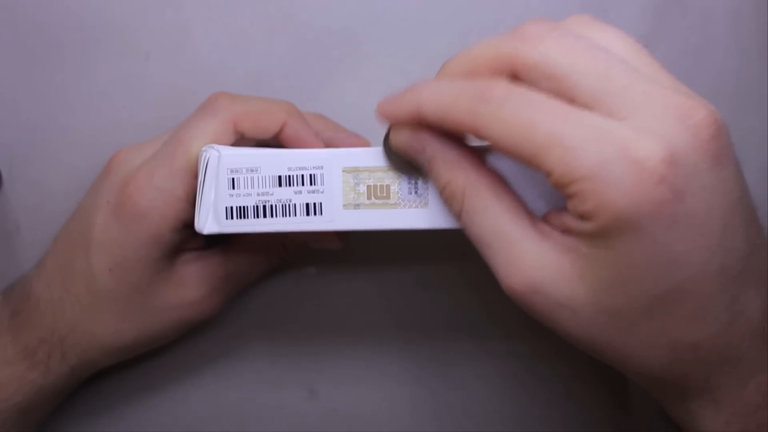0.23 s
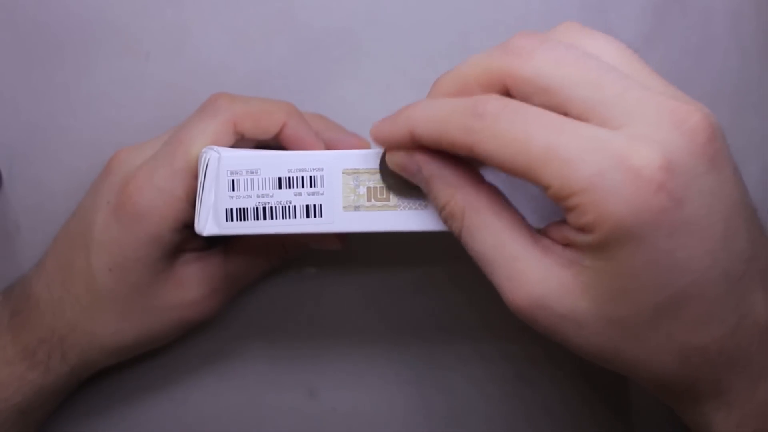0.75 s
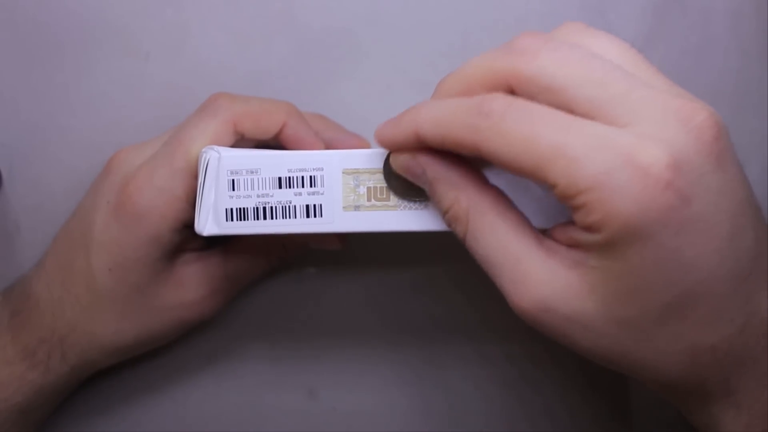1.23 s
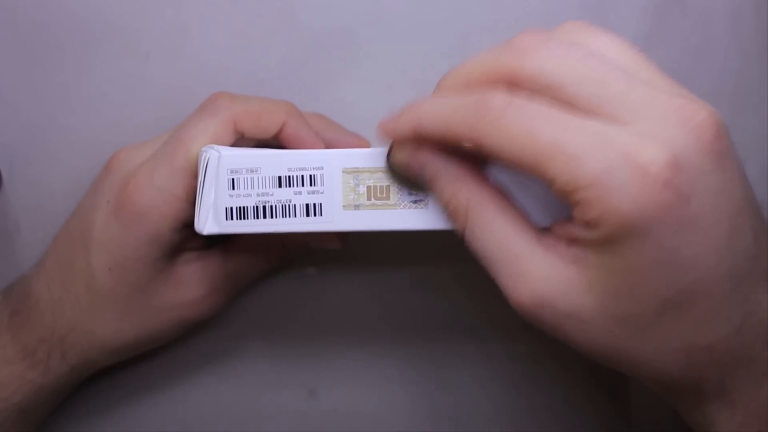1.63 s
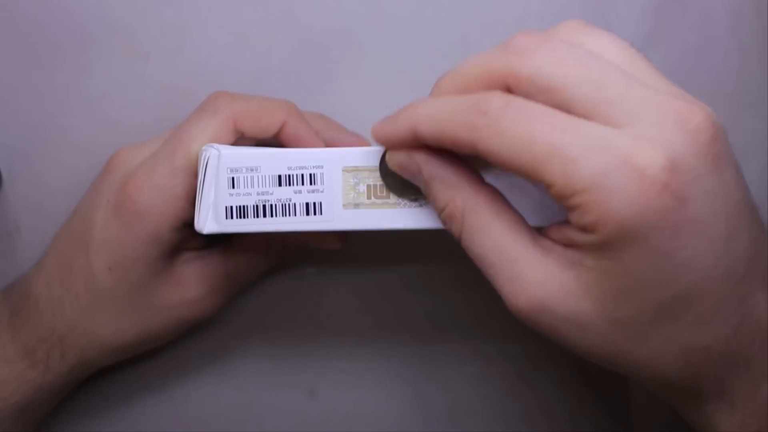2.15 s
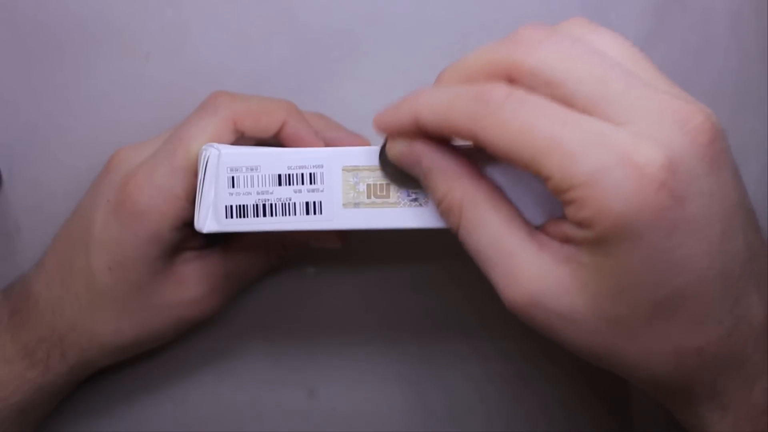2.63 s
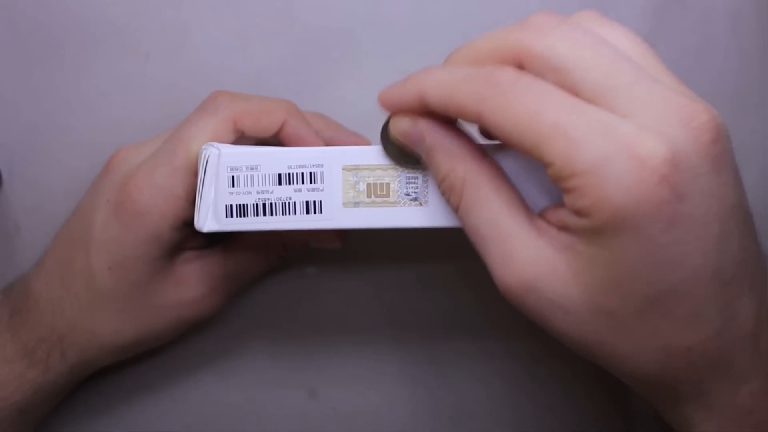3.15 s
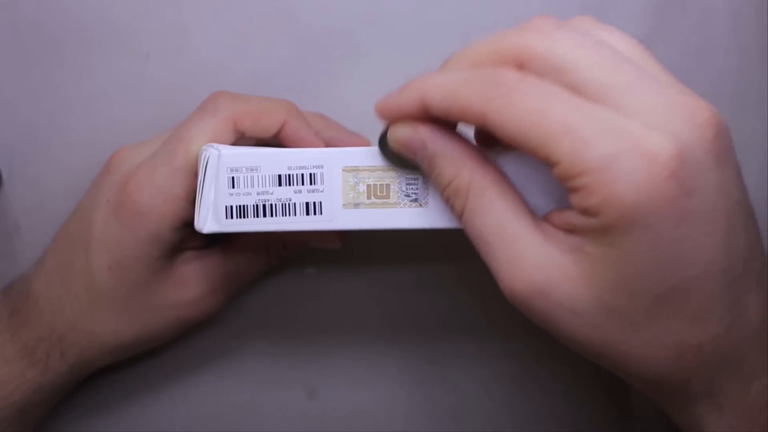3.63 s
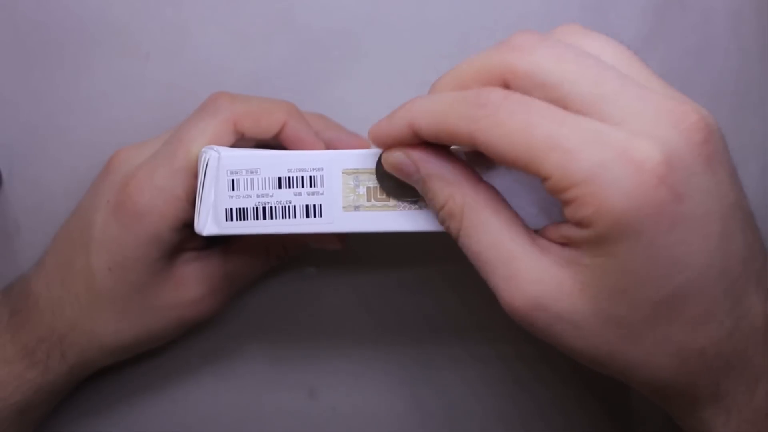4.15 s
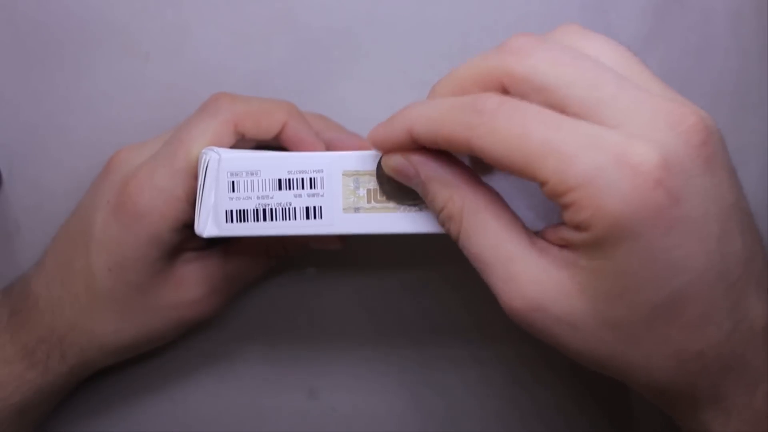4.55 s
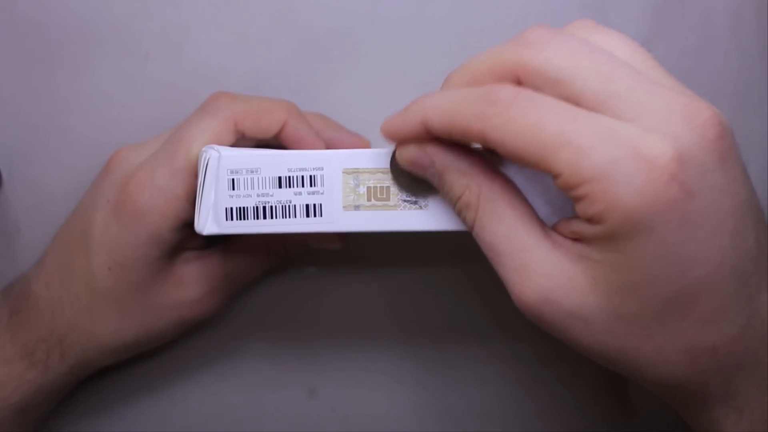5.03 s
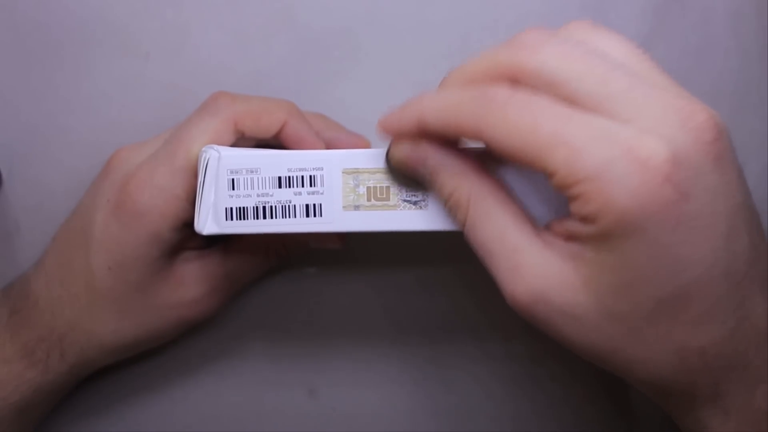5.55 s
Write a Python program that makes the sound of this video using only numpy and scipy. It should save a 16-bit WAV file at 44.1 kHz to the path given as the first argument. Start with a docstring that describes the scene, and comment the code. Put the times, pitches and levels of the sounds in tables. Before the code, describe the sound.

A coin scratches rapidly back and forth at the coating on a small cardboard box, catching and knocking a few times midway.

```python
"""A coin scratches the coating off a label on a small hand-held cardboard box, about nine strokes a second.
Its edge sticks and slips and rings the box: pushes sound bright, pulls hollow. Midway the coin
catches, lifts and knocks down again a few times; a few chips of coating tick off.
A small room answers, over a faint hiss."""
import sys
import numpy as np
from scipy import signal
from scipy.fft import rfft, irfft, next_fast_len
from scipy.io import wavfile

SR = 44100
rng = np.random.default_rng(int(sys.argv[2]) if len(sys.argv) > 2 else 0)


def log_audio(samples):
    """Write samples as a 16-bit WAV file to the path given in sys.argv[1]."""
    # one column per channel
    frames = np.atleast_2d(samples).T
    # limit to full scale, then quantise
    limited = np.clip(frames, -1, 1)
    pcm = np.round(limited * 32767).astype(np.int16)
    wavfile.write(sys.argv[1], SR, pcm)


N = 255720


def undb(db):
    return 10 ** (np.asarray(db) / 20)


def unit_rms(x):
    return x / np.sqrt(np.mean(x ** 2))


def freqs(size):
    return np.linspace(0, SR / 2, size // 2 + 1).clip(1)


def contour(points, f):
    """Gain along (f/Hz, level/dB) points."""
    hz, db = np.transpose(points)
    return undb(np.interp(np.log(f), np.log(hz), db))


def resonance(f, hz, width_hz):
    """Gain of one steep-sided resonance."""
    return 1 / (1 + ((f * f - hz * hz) / (f * width_hz)) ** 2)


def response(gain):
    """Minimum-phase impulse response of this spectral shape, unit energy."""
    cepstrum = irfft(np.log(gain + 1e-9))
    half = len(cepstrum) // 2
    ir = irfft(np.exp(rfft(2 * cepstrum[:half], 2 * half)))[:half]
    return ir / np.linalg.norm(ir)


def filtered(x, gain):
    size = 2 * next_fast_len(N // 2 + SR // 4, real=True)
    return irfft(rfft(x, size) * gain(freqs(size)))[..., :N]


def ring(x, ir):
    return signal.fftconvolve(x, ir)[:N]


def impulse(start_s, db):
    return undb(db) * signal.unit_impulse(N, int(start_s * SR))


def bands(force, drum_hz=950, grit_hz=2100):
    """Split a force into panel drum (low), rasp (mid) and coating grit (high)."""
    drum = filtered(force, lambda f: 1 / (1 + (f / drum_hz) ** 8))
    grit = filtered(force, lambda f: 1 / (1 + (grit_hz / f) ** 8))
    return np.array([drum, force - drum - grit, grit])


def friction(speed, slip_hz, jitter=0.45, scatter_db=4, dust_db=-5, patch_db=1.0, patch_hz=160):
    """Uneven slips of the edge, quicker at speed, in the crackle of patchy, crumbling coating."""
    gaps, sizes, coating = rng.standard_normal((20000, 3)).T
    rate_hz = slip_hz * (0.3 + 0.7 * speed)
    onsets = np.searchsorted(np.cumsum(rate_hz) / SR, np.cumsum(np.exp(jitter * gaps)))
    slips = np.bincount(onsets, undb(scatter_db * sizes), N + 1)[:N] / np.sqrt(rate_hz)
    dust = undb(dust_db) * rng.standard_normal(N)
    patches = np.interp(np.arange(N) / SR * patch_hz, np.arange(len(coating)), coating)
    return unit_rms((unit_rms(slips - slips.mean()) + dust) * undb(patch_db * patches))


# Box and coin resonances, plus one room mode near 224 Hz: f/Hz, width/Hz, push level/dB, pull level/dB
MODES = [(139.4, 107, -28.5, -23), (224.3, 12.4, -21, -14), (300.8, 41.5, -25.5, -8.5),
         (379, 73, -14.5, -7.5), (478, 112, -15, -5.5), (553, 36.3, -17.5, -1.5), (608, 92, -9.5, -5),
         (785, 150, -19, -9), (862, 16.5, -6, 0), (915, 39, -8.5, -9.5), (1008, 99, -14, -9.5),
         (1127.3, 40.6, -10.5, -0.5), (1184, 66, -10, -0.5), (1252, 137, -6, -4), (1348.4, 62, -4.5, -2.5),
         (1447, 71, -12.5, -13), (1680, 360, -17, -18), (2042, 184, -2, -8.5), (2352, 146, -22, -11),
         (2630, 710, -16.5, -17), (3296, 590, -15.5, -17.5), (3768, 198, -11, -17),
         (4280, 590, -18.5, -17.5), (4774, 540, -19, -21.5), (5584.0, 193, -20, -22),
         (6270, 810, -30.5, -32.5), (7100, 2440, -34.5, -34.5), (9560, 580, -43, -37.5),
         (11090, 1260, -38, -38), (13000, 5000, -47, -44)]

def box(tilt, wander, vary_db=2.39, detune=0.0049):
    """Box, coin and one room mode. Coin tilt (0 push, 1 pull) weights them; contact wander varies them."""
    hz, width_hz, push_db, pull_db = np.transpose(MODES)[:, :, None]
    level_shift, pitch_shift = wander * rng.standard_normal((2, len(MODES), 1))
    db = push_db + tilt * (pull_db - push_db) + vary_db * level_shift
    gains = undb(db) * resonance(freqs(8192), hz * (1 + detune * pitch_shift), width_hz)
    return response(np.linalg.norm(gains, axis=0))


# Slow drift of the panel drum: t/s, level/dB
DRUM_DRIFT = [(0, 0.5), (1.4, 1.2), (2, -1.5), (2.6, 2.3), (3.6, -2), (4.5, -1.5), (5.8, -2.2)]

def scrape(strokes, law, tilt, slip_hz):
    """Friction rings the box. Speed drives all bands; pressure adds rasp and grit, hardly any drum."""
    t, speed, drives = np.arange(N) / SR, np.zeros(N), []
    base_db, pressure_slope, rise_power, fall_power = np.transpose(law)
    for start_s, rise_s, fall_s, pressure_db in strokes:
        turns_s = start_s + np.cumsum([0, rise_s, fall_s])
        span = slice(*np.searchsorted(t, turns_s[::2]))
        phase = np.interp(t[span], turns_s, [0, 1, 2])
        speed[span] = np.abs(np.sin(np.pi / 2 * phase))
        band_db = base_db + pressure_slope * pressure_db
        band_db[0] += np.interp(start_s, *np.transpose(DRUM_DRIFT))
        drive = speed[span, None] ** np.where(phase[:, None] < 1, rise_power, fall_power)
        drives.append((span, (drive * undb(band_db)).T))
    force = bands(friction(speed, slip_hz))
    out = np.zeros(N + SR)
    for span, drive in drives:
        stroke = signal.fftconvolve((force[:, span] * drive).sum(axis=0), box(tilt, wander=0.91))
        out[span.start:span.start + len(stroke)] += stroke
    return out[:N]


# Back strokes: t/s, speed rise/s, speed fall/s, pressure/dB
PULL_STROKES = [(-.004, .033, 0.056, -7.5), (.252, 0.0041, 0.087, 0.5), (.495, .011, 0.068, -1),
                (.719, .033, 0.045, 2), (.942, .033, 0.043, 1.5), (1.171, .014, 0.07, 1),
                (1.39, .019, 0.069, 1.5), (1.628, .037, .054, 1), (1.845, 0.039, 0.049, 1.7),
                (2.069, 0.021, 0.085, 2.2), (2.297, 0.024, 0.07, -1.5), (2.526, .014, 0.082, .5),
                (2.753, .016, 0.079, 1), (2.976, 0.019, .081, -0.3), (3.225, 0.0089, 0.098, -3.3),
                (3.603, .004, 0.021, 3), (3.887, .006, 0.064, 3.5), (3.965, .018, 0.043, 1.5),
                (4.05, .075, .02, 1), (4.284, .025, .028, 1.5), (4.488, 0.029, 0.034, -1),
                (4.698, 0.015, .054, -5.5), (4.884, 0.035, .046, -9), (5.144, 0.027, .027, 0.8),
                (5.354, .049, .022, 0.5), (5.553, .033, 0.044, 0.9), (5.749, 0.044, 0.039, 1)]
# Pull drum, rasp, grit: level/dB, pressure slope/(dB/dB), rising and falling speed exponents
PULL_BANDS = [(-31, .2, 0.16, 0.69), (-30, 0.84, 0.6, 1.3), (-29.5, 1.43, 1.33, 1.5)]

def pulls():
    """The coin drags back with slower slips: hollow, mostly biting early and trailing off."""
    return scrape(PULL_STROKES, PULL_BANDS, tilt=1, slip_hz=599)


# Forward strokes: t/s, length/s, pressure/dB
PUSH_STROKES = [(0.158, 0.08, -2.4), (0.395, .085, -1.5), (.642, .065, -1.5), (0.846, .071, 1),
                (1.072, 0.076, -2.5), (1.301, 0.071, -0.8), (1.521, 0.079, 2), (1.748, .086, -0.3),
                (1.976, 0.085, 3.5), (2.205, 0.08, 0.5), (2.423, 0.093, 1.5), (2.659, .085, -0.5),
                (2.898, 0.07, 0.3), (3.125, 0.087, -0.2), (3.389, .082, -1), (3.635, .06, 0.5),
                (4.216, .055, -4.5), (4.418, 0.054, 0.5), (4.627, 0.051, -4), (4.803, 0.065, -4.5),
                (5.06, 0.07, -5), (5.277, 0.065, 0.2), (5.481, 0.065, 0), (5.675, 0.088, 1.5)]
# Push drum, rasp, grit: level/dB, pressure slope/(dB/dB), rising and falling speed exponents
PUSH_BANDS = [(-29.5, -0.08, 0.42, 0.87), (-33, 1.04, 1.1, 0.77), (-30.5, 1.16, 1.04, 1.65)]

def pushes(rise_share=0.53):
    """The coin drives forward with quicker slips: bright, swelling and fading evenly."""
    strokes = [(start_s, rise_share * length_s, (1 - rise_share) * length_s, pressure_db)
               for start_s, length_s, pressure_db in PUSH_STROKES]
    return scrape(strokes, PUSH_BANDS, tilt=0, slip_hz=1002.5)


# Wave paths between the box folds: delay/s
FOLD_DELAYS_S = [.00029, .00053, .00083]

def folds(x, bounce):
    """Waves bounce between the folds, smearing each click without colouring it (all-pass)."""
    for delay_s in FOLD_DELAYS_S:
        taps = np.r_[bounce, np.zeros(int(delay_s * SR)), 1]
        x = signal.lfilter(taps, taps[::-1], x)
    return x


# Room reverberation: f/Hz, level/dB, T60/s
ROOM_BANDS = [(220, -3.5, 0.22), (585, -8.5, 0.38), (1100, -8, 0.31), (2310, -11.5, 0.25),
              (12100, -24, 0.45)]

def room(x, gap_s=0.00624):
    """Diffuse reflections, weaker in the treble; each band decays at its own rate."""
    size = SR // 2
    t, f = np.arange(size) / SR, freqs(size)
    noise = rfft(rng.standard_normal(size))
    log_centres = np.log([hz for hz, _, _ in ROOM_BANDS])
    ir = np.zeros(size)
    for pick, (_, db, t60_s) in zip(np.eye(len(ROOM_BANDS)), ROOM_BANDS):
        band = irfft(noise * np.interp(np.log(f), log_centres, pick), size)
        fade = undb(-60 * t / t60_s) * (t > gap_s)
        ir += undb(db) * band * fade / np.linalg.norm(fade)
    return ring(x, ir)


# Background spectrum: f/Hz, relative density/dB
HISS_SPECTRUM = [(22, -55), (35, 4.5), (55, -11.5), (180, 2.5), (1500, -1.5), (11000, -14.5),
                 (16000, -18.5)]

def hiss(rms_db=-56):
    """Steady hiss with a little rumble."""
    noise = filtered(rng.standard_normal(N), lambda f: contour(HISS_SPECTRUM, f))
    return undb(rms_db) * unit_rms(noise)


# Coin knocks: t/s, level/dB, relative treble/dB, relative thud/dB
COIN_KNOCKS = [(1.955, -20, 3, -27), (3.4679, 7, -7, -31), (3.5955, -8.5, 2, -3), (3.603, 0.5, -1, -8.5),
               (3.774, 2, -8, -9), (3.891, -5.5, 2, -2.5), (3.985, -5.5, -2, -7.5), (5.639, -19, 15, -10)]

def knocks(drum_db=3, rim_hz=520, thud_hz=320, thud_width_hz=170):
    """The edge drops on the box. Hard contact adds treble; heavy contact shoves the hand-damped box."""
    force, shove = np.zeros((2, N))
    for start_s, db, treble_db, thud_db in COIN_KNOCKS:
        force += undb([drum_db, 0, treble_db]) @ bands(impulse(start_s, db))
        shove += impulse(start_s, db + thud_db)
    # near the stiff rim a blow hardly moves the lowest modes
    force = signal.lfilter(*signal.butter(2, rim_hz, "high", fs=SR), force)
    thud = response(resonance(freqs(8192), thud_hz, thud_width_hz))
    return ring(force, box(tilt=0.77, wander=0)) + ring(shove, thud)


# Coating chips: t/s, level/dB
CHIP_TICKS = [(3.7447, -19), (5.6385, -25), (5.641, -20.5), (5.6436, -26)]
# Tick spectrum: f/Hz, relative level/dB
CHIP_SPECTRUM = [(1200, -21), (2800, 1), (4500, 4), (8000, 3.5), (15000, -16)]

def chips(decay_s=0.00025):
    """Chips of coating snap off with dry ticks; knocks() adds a faint box ring to the last cluster."""
    t = np.arange(512) / SR
    crack = rng.standard_normal(len(t)) * np.exp(-t / decay_s)
    colour = response(contour(CHIP_SPECTRUM, freqs(len(t))))
    tick = np.convolve(crack / np.linalg.norm(crack), colour)
    return ring(sum(impulse(start_s, db) for start_s, db in CHIP_TICKS), tick)


def scene():
    """Coin and box close by, the room behind them; mono."""
    near = folds(pushes() + pulls(), bounce=0.55) + folds(knocks(), bounce=0.78) + chips()
    return (near + room(near) + hiss())[None]


def record(dry):
    """Steep low-pass."""
    cutoff_hz = 15850
    return signal.sosfilt(signal.ellip(10, 0.2, 70, cutoff_hz, fs=SR, output="sos"), dry)


dry = scene()
out = record(dry)
log_audio(out)
```